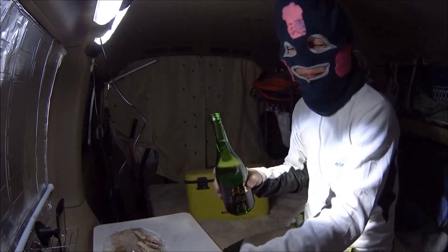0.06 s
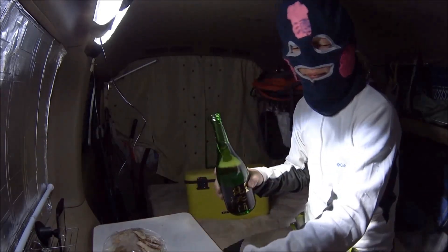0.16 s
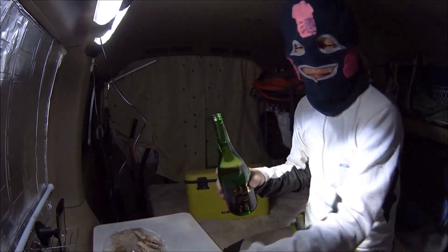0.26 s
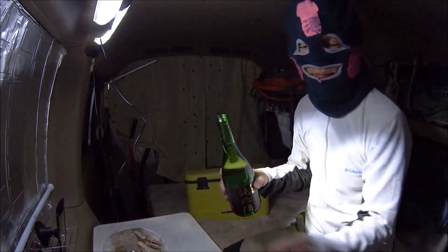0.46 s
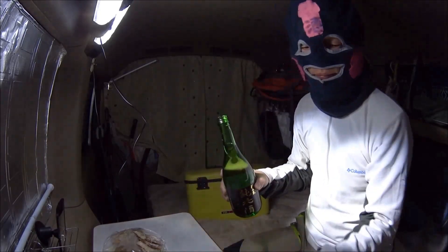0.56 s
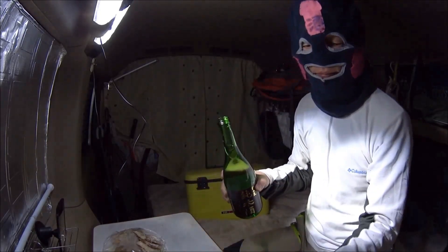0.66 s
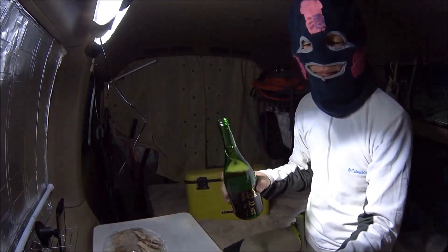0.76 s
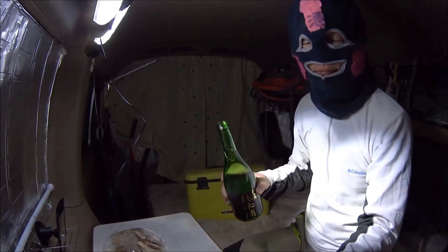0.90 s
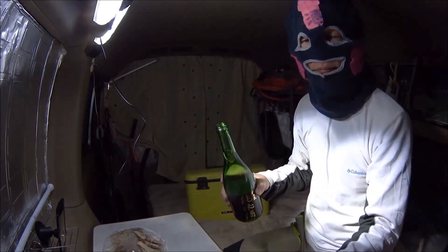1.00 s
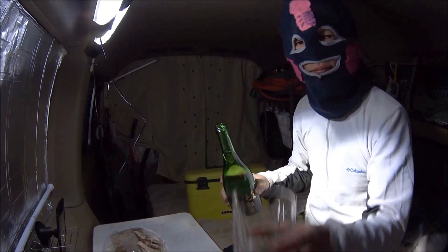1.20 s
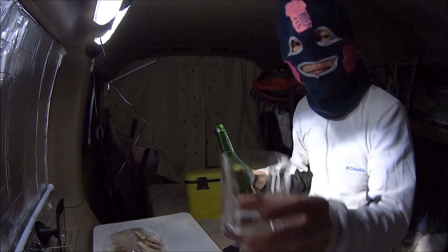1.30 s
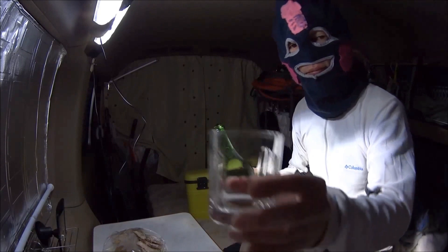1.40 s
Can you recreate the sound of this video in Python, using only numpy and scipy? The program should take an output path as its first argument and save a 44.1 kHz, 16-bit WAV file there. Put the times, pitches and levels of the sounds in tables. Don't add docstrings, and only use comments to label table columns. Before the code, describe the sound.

Stiff cap and seal cracking off a glass bottle, sharp snaps, brief ringing, small rattling clicks

```python
import sys
import numpy as np
from scipy import signal
from scipy.io import wavfile

SR = 44100
rng = np.random.default_rng(int(sys.argv[2]) if len(sys.argv) > 2 else 0)


def volts_from_db(level):
    exponent = np.asarray(level, float) / 20
    return 10 ** exponent


def waveform_to_disk(signal):
    frames = np.transpose(np.atleast_2d(signal))
    scaled = np.clip(frames, -1, 1) * 32767
    samples = np.round(scaled).astype(np.int16)
    wavfile.write(sys.argv[1], SR, samples)


N = 63945


def in_time(rows):
    return np.interp(np.arange(N) / SR, *np.transpose(rows))


def at_hz(points, hz):
    points = np.array(points)
    return np.interp(np.log(hz), np.log(np.maximum(points[:, 0], 1)), points[:, 1])


def rms_one(x):
    return x / np.sqrt(np.mean(x ** 2) + 1e-20)


def peak_one(x):
    return x / np.abs(x).max()


def pan(db):
    return volts_from_db(np.array([[db / 2], [-db / 2]]))


def drift(rate):
    r = np.exp(-80 * np.pi * rate / SR)
    white = rng.standard_normal(N // 40 + 2002)
    slow = rms_one(signal.lfilter([1], [1, -2 * r, r * r], white)[2000:])
    return np.interp(np.arange(N) / 40, np.arange(len(slow)), slow)


def ring(x, hz, t60):
    r, w = volts_from_db(-60 / (t60 * SR)), 2 * np.pi * hz / SR
    return signal.lfilter([0, np.sin(w)], [1, -2 * r * np.cos(w), r * r], x + 1e-18)


def banded_noise(spectrum, patchy_db):
    # frequency in Hz, left-right likeness (correlation, no unit).
    ear_likeness = [(60, 1), (220, 0.62), (830, -0.39), (3070, 0.34), (11400, 0.86)]
    out, band_hz = 0, 22 * 2 ** np.arange(0, 9.6, .5)
    white = rng.standard_normal((2, 2, N))
    for k, (low, high) in enumerate(zip(band_hz, band_hz[1:])):
        centre_hz = np.sqrt(low * high)
        band = signal.butter(2, [low, high], "band", fs=SR, output="sos")
        mid, side = signal.sosfilt(band, white[k % 2])
        alike = np.clip(at_hz(ear_likeness, centre_hz), -1, 1)
        gain = volts_from_db(at_hz(spectrum, centre_hz) + patchy_db * drift(8.6))
        out = out + gain * (np.sqrt(1 + alike) * mid + np.sqrt(1 - alike) * side * [[1], [-1]])
    return rms_one(out)


def room_hiss():
    # frequency in Hz, level in dB.
    hiss_spectrum = [(15, -49), (25, -16.5), (296, -7), (401, -8), (603, -8.5), (668, -5), (819, -8.5),
                     (1800, -13.5), (11000, -36.5), (14300, -57.5), (22000, -120)]
    return volts_from_db(-61) * banded_noise(hiss_spectrum, patchy_db=.4)


def sleeve():
    # time in s, level in dB.
    arm_motion = [
        (.3, -67),
        (.44, -61),
        (.55, -59.5),
        (.72, -59),
        (.8, -60.5),
        (.92, -61.5),
        (1.05, -65),
        (1.3, -66.5),
    ]
    # frequency in Hz, level in dB.
    cloth_spectrum = [(180, -44.5), (300, 9), (424, -22), (657, 6.5), (987, 4), (2000, 5.5), (3250, 3.5),
                      (8020, -2), (11000, -13), (14300, -62), (22000, -120)]
    return volts_from_db(in_time(arm_motion)) * banded_noise(cloth_spectrum, patchy_db=1.0)


def rubs():
    # start in s, length in s, centre frequency in Hz, bandwidth in Hz.
    strokes = [(.455, .11, 4600, 140), (.58, .12, 1990, 170), (.49, .28, 7040, 300), (.52, .29, 7900, 350),
               (.58, .2, 3500, 300), (.795, .04, 6600, 500), (.85, .05, 6500, 120), (.93, .08, 7100, 200),
               (.83, .045, 410, 120), (.868, .045, 410, 140), (.88, .08, 570, 100), (.082, .03, 670, 60),
               (1.19, .055, 8900, 4000), (1.35, .05, 400, 80), (1.0, .16, 4450, 200),
               (1.14, .015, 6500, 4000)]
    stroke_db = [-62, -62.5, -70, -67.5, -72, -69, -71, -71, -61.5, -61.5, -74, -64, -67.5, -64, -72, -70.5]
    stroke_glide = [-330, 0, 0, 0, 0, 500, 0, 100, 0, 0, 0, 0, 0, 0, 330, 0]
    out, t = np.zeros(N), np.arange(N) / SR
    for (s, length, hz, width_hz), db, glide_hz in zip(strokes, stroke_db, stroke_glide):
        along = np.clip((t - s) / length, 0, 1)
        narrow = signal.butter(2, width_hz / 2, fs=SR, output="sos")
        a, b = signal.sosfilt(narrow, rng.standard_normal((2, N)))
        phase = 2 * np.pi * np.cumsum(hz + glide_hz * (along - .5)) / SR
        swell = np.sin(np.pi * along ** .7) ** .8
        out += volts_from_db(db) * swell * rms_one(a * np.cos(phase) + b * np.sin(phase))
    return out


def crumple():
    # time in s, level in dB.
    twist = [
        (.2, -95),
        (.27, -62),
        (.298, -54),
        (.31, -49),
        (.335, -62.5),
        (.36, -52),
        (.41, -51.5),
        (.44, -51.5),
        (.49, -80),
    ]
    crinkles_per_s, cycles = 2500, 17
    sizes = volts_from_db(4 * np.minimum(rng.exponential(1, (2, N)), 5)) * rng.choice([-1, 1], (2, N))
    born = sizes * (rng.random((2, N)) < crinkles_per_s / SR)
    clicks = born[0] + 0.51 * born[1] * np.array([[1], [-1]])
    dealt = rng.integers(0, 16, N)
    pitches = np.geomspace(1060, 4570, 16)
    rings = sum(ring(clicks * (dealt == k), hz, cycles / hz) for k, hz in enumerate(pitches))
    return volts_from_db(in_time(twist + [(.6, -130)])) * rms_one(rings)


def cap_tone(grit, hz, ms):
    mode_pitches = [1180, 1950, 2210, 2530, 2740, 3330, 4290, 4850, 5330, 6400, 7450, 8300, 9000, 10300]
    # level in dB, decay time t60 in s.
    mode_lives = [(38, 0.034), (-14.5, 0.025), (9.5, 0.025), (-0.5, 0.039), (-2, 0.027), (5.5, 0.02),
                  (7, 0.014), (5.5, 0.0039), (10.5, 0.0064), (-6.5, 0.0065), (-6, 0.0038), (-4, 0.006),
                  (-6, 0.0035), (-6.5, 0.0019)]
    reach_octaves, longest_s = 0.31, .032
    tone = 0
    for k, (mode_hz, (mode_db, t60)) in enumerate(zip(mode_pitches, mode_lives)):
        octaves_off = np.log2(mode_hz / hz)
        gain = volts_from_db(mode_db - 9.8 * (octaves_off / reach_octaves) ** 2 * np.sqrt(ms))
        tone = tone + (-1) ** k * gain * peak_one(ring(grit, mode_hz, min(t60, longest_s)))
    return peak_one(tone)


def snaps():
    # start in
    # s, brightest frequency in Hz, burst length in ms.
    snap_events = [(.2038, 8100, 1.5), (.2045, 2700, 3.0), (.2052, 3330, 5.0), (.2078, 7700, 1.2),
                   (.2050, 5100, 3.0), (.2240, 2900, 5.0), (.2300, 2650, 3.0), (.2472, 2560, 7.0),
                   (.2476, 5300, 3.0), (.2664, 4450, 3.0), (.2673, 2230, 3.0), (.2666, 10200, 1.0),
                   (.2695, 3350, 2.5), (.2715, 2300, 3.0), (.2802, 6900, .7), (.2850, 3300, 5.0),
                   (.3060, 3000, 2.0), (.2042, 4260, 5.0), (.2245, 5400, 4.0), (.2265, 4250, 3.0),
                   (.2690, 5300, 3.0), (.2975, 2600, 1.5), (.3065, 8200, 3.0),
                   (.3570, 7000, 2.0), (.3597, 7200, 1.0), (.3600, 5000, 2.0), (.3622, 8600, 3.0),
                  (.3834, 3600, .5), (.3850, 2500, 4.0), (.3940, 5000, .6), (.4012, 6400, 1.0),
                  (.4070, 4200, 1.5), (.4072, 10000, 1.5), (.4182, 7700, .8), (.4183, 4750, 1.0),
                  (.4225, 5200, .8), (.4350, 5200, .8), (.4560, 4500, 1.0), (.8372, 2600, .6),
                  (.4090, 2150, 4.0), (.3630, 4300, 2.5), (.3880, 3100, 2.5), (.4015, 9600, 1.0),
                  (.4195, 2250, 5.0), (.4228, 9600, 1.5), (.4285, 4600, 1.0)]
    # peak level in dB, hollow body knock in dB.
    snap_strengths = [(-8.5, -42), (-13.5, -47.5), (-15.5, -35), (-14.5, -53), (-20.5, -38.5), (-24, -36),
                      (-21.5, -39.5), (-25, -38.5), (-27.5, -66), (-18.5, -43), (-14.5, -32.5),
                      (-21.5, -31.5), (-20, -34), (-20, -26), (-31.5, -36), (-38.5, -43), (-41, -68),
                      (-21, -60), (-36, -60.5), (-34.5, -58.5), (-32, -78), (-42, -60), (-50, -68),
                      (-31.5, -49), (-23, -38), (-32, -48), (-28.5, -55), (-33, -78), (-34.5, -45),
                        (-39, -44.5), (-30, -37.5), (-33, -38.5), (-30.5, -79), (-31.5, -42.5),
                        (-32.5, -71), (-34, -34), (-39, -39), (-60, -50), (-54.5, -77), (-34.5, -78),
                        (-51, -67), (-45, -65), (-46, -74), (-43.5, -70), (-49, -75), (-51, -75)]
    crack_db, fray_db, fray_t60_s = -7, -18.5, 0.075
    size = SR // 8
    t, out, knocks = np.arange(size) / SR, np.zeros((2, N + size)), np.zeros(N)
    dull = signal.butter(1, 5500, fs=SR, output="sos")
    fray_shape = volts_from_db(fray_db - 60 * t / fray_t60_s) * (1 - np.exp(-t / 0.0015))
    events = zip(snap_events, snap_strengths)
    for (s, hz, ms), (db, body_db) in events:
        white = rng.standard_normal((3, size))
        grit = np.append(5.5, white[0, 1:] * np.abs(white[0, 1:]))
        grit = grit * np.exp(-t / (.4e-3 * max(ms, .2)))
        wide = signal.butter(2, [hz / 3.5, min(hz * 1.8, 16000)], "band", fs=SR, output="sos")
        crack = volts_from_db(crack_db) * 2 * peak_one(signal.sosfilt(wide, grit)) / ms
        tearing = white[0, ::-1] + .4 * white[1:]
        fray = rms_one(signal.sosfilt(np.vstack([wide, dull]), tearing)) * fray_shape
        i = int(s * SR)
        out[:, i:i + size] += volts_from_db(db) * (cap_tone(grit, hz, ms) + crack + fray)
        knocks[i] += volts_from_db(body_db)
    thin = signal.butter(4, 418.5, "high", fs=SR, output="sos")
    return signal.sosfilt(thin, out[:, :N]), knocks


def hollow_body(knocks):
    # frequency in Hz, level in dB, decay time t60 in s, left over right in dB.
    body_modes = [(153, -26.5, 0.079, 2), (449, -20.5, 0.025, 18.5), (668, -5.5, 0.15, -8),
                  (694, -10.5, 0.14, -13.5), (1004, -5.5, 0.033, -3.5), (1224, -11.5, 0.039, 3.5),
                  (1480, -5.5, 0.049, 4), (1523, -5.5, 0.15, 1), (2290, -17, 0.046, 11)]
    out = 0
    for hz, db, t60, pan_db in body_modes:
        tone = signal.lfilter([.1, 0, -.1], [1, -.8], ring(knocks, hz, t60))
        out = out + volts_from_db(db) * pan(pan_db) * tone * 5000 / hz
    return out


def glass():
    # moment struck in s, frequency in Hz.
    strikes = [(.2045, 2215), (.2045, 6235), (.2045, 6440), (.2045, 6730), (.2045, 7208), (.2045, 7994),
               (.2045, 10582), (.2045, 10938), (.2803, 3930), (.2803, 7219), (.2803, 8689), (.2803, 9065),
               (.2803, 6460), (.2803, 10940), (.3597, 4975), (.3597, 7215), (.3597, 10940), (.4185, 7219),
               (.4185, 6735), (.8372, 1000), (.8372, 2000), (.8372, 3650), (.8372, 3980)]
    # level in dB, decay time t60 in s.
    ring_lives = [(-55, 0.23), (-31.5, 0.17), (-28.5, 0.046), (-30, 0.15), (-23.5, 0.18), (-46, .07),
                  (-32, 0.097), (-38, .17), (-41, 0.12), (-51.5, 0.23), (-49.5, 0.14), (-59.5, 0.3),
                  (-37.5, 0.055), (-78, 0.064), (-41, 0.1), (-53, 0.15), (-39, 0.041), (-55, 0.12),
                  (-63, 0.43), (-53, 0.09), (-55, 0.056), (-56, .03), (-59, 0.13)]
    grip_s, grip_t60_s = .263, 0.01
    waver_db = 1.0
    out, t = np.zeros((2, N)), np.arange(N) / SR
    phases = rng.uniform(-0.21, 1, (len(strikes), 2))
    for (s, hz), (db, t60), (phase, lead) in zip(strikes, ring_lives, phases):
        age = np.maximum(t - s, 0)
        choke_db = -60 * np.maximum(t - grip_s, 0) / grip_t60_s * (s < grip_s)
        fall_db = db - 60 * age / t60 + np.maximum(choke_db, -200)
        swell = (1 - np.exp(-age / 0.0016)) * volts_from_db(fall_db + waver_db * drift(40))
        ear_phase = np.pi * phase + 0.12 * lead * np.array([[1], [-1]])
        out += swell * np.sin(2 * np.pi * hz * age + ear_phase)
    return out * pan(2.5)


def cabin(x):
    t60_s, wall_cut_hz = 0.18, 2200
    out, dull = np.zeros((2, N)), np.exp(-2 * np.pi * wall_cut_hz / SR)
    lags = (rng.uniform(.003, .013, 16) * SR).astype(int)
    for k, lag in enumerate(lags):
        loop, gain, state = x.copy(), volts_from_db(-60 * lag / SR / t60_s), [0.]
        for i in range(lag, N, lag):
            back, state = signal.lfilter([gain * (1 - dull)], [1, -dull], loop[i - lag:i], zi=state)
            loop[i:i + lag] += back[:N - i]
        out[k % 2] += (loop - x) * (-1) ** (k // 2)
    return out


def scene():
    cap, knocks = snaps()
    near = cap + rubs() + crumple()
    body = hollow_body(knocks)
    air = sleeve() + room_hiss()
    direct = near * pan(3) + body + glass()
    echo = volts_from_db(-15) * cabin(near.mean(0) + 0.23 * body.sum(0))
    return direct + echo + air


def band_limit(x):
    return signal.sosfilt(signal.butter(12, 12010, fs=SR, output="sos"), x)


def record(dry):
    dry = 1.2 * np.tanh(dry / 1.2)
    cut = signal.sosfilt(signal.ellip(10, .5, 80, 10980, fs=SR, output="sos"), dry)
    skirt = signal.sosfilt(signal.butter(12, 11300, fs=SR, output="sos"), dry)
    return band_limit(cut + volts_from_db(-25) * skirt)


dry = scene()
out = record(dry)
waveform_to_disk(out)
```